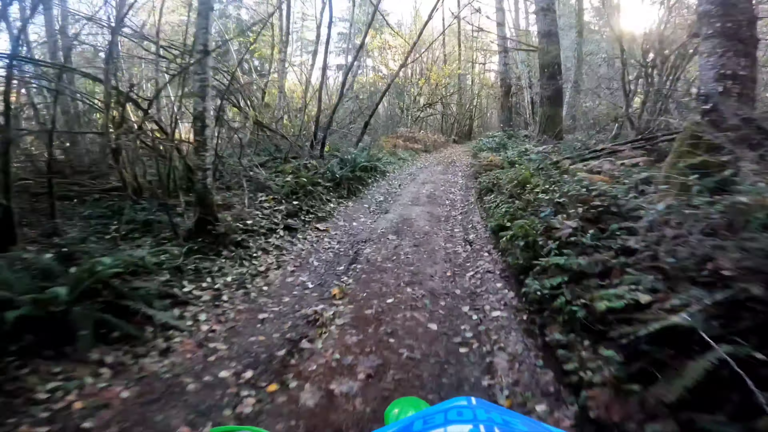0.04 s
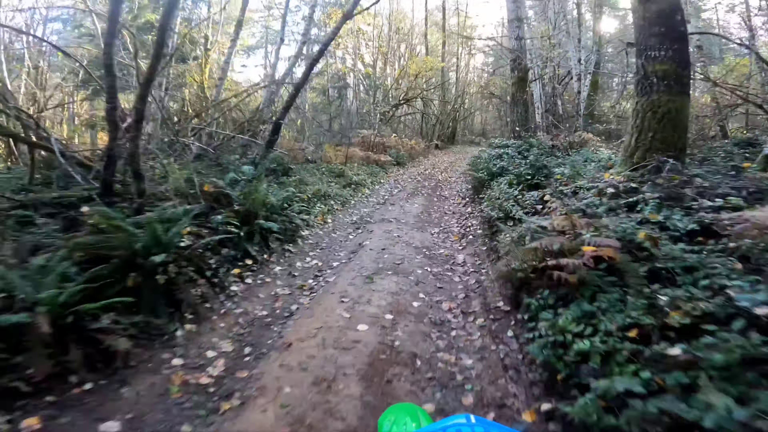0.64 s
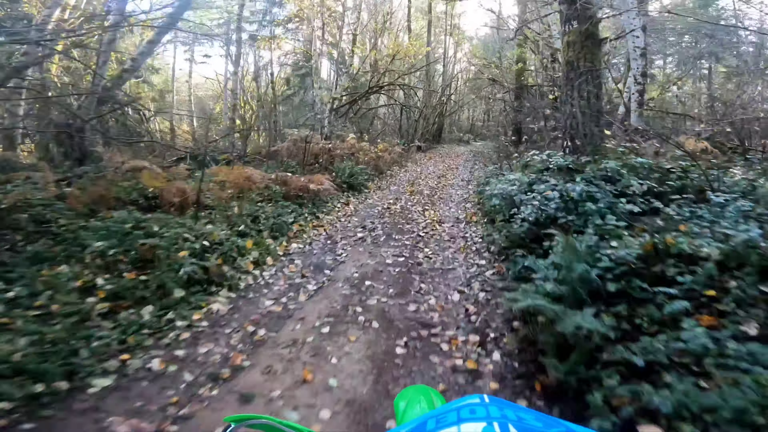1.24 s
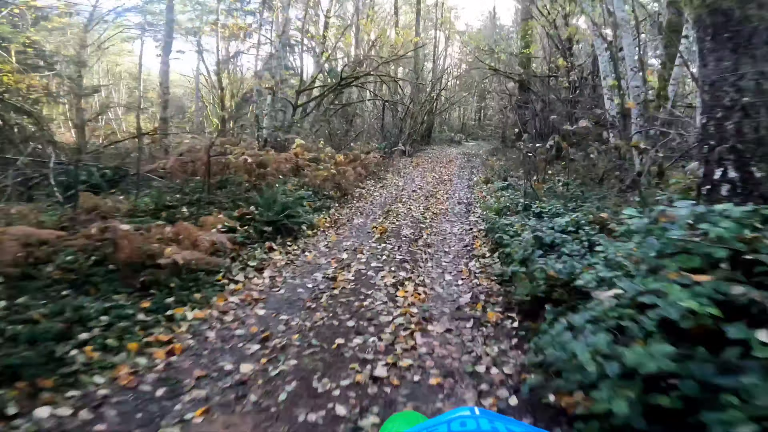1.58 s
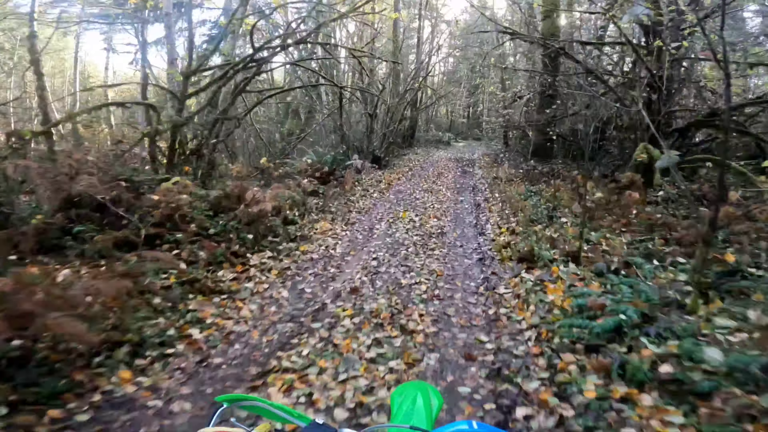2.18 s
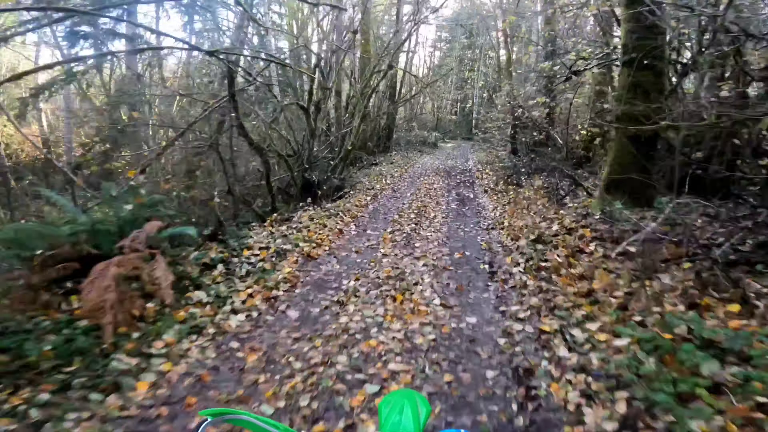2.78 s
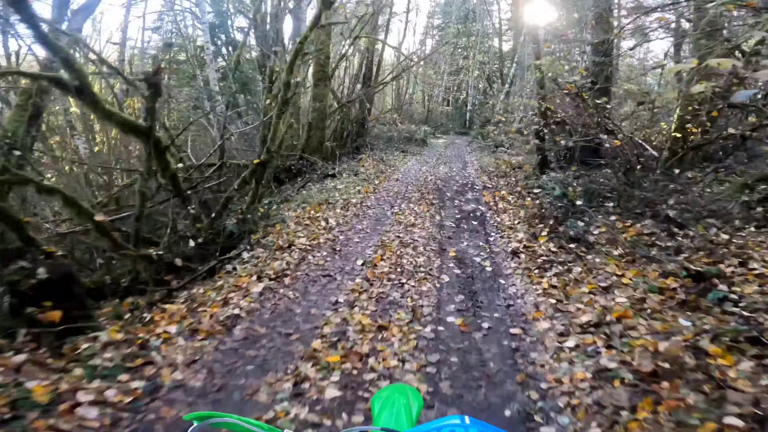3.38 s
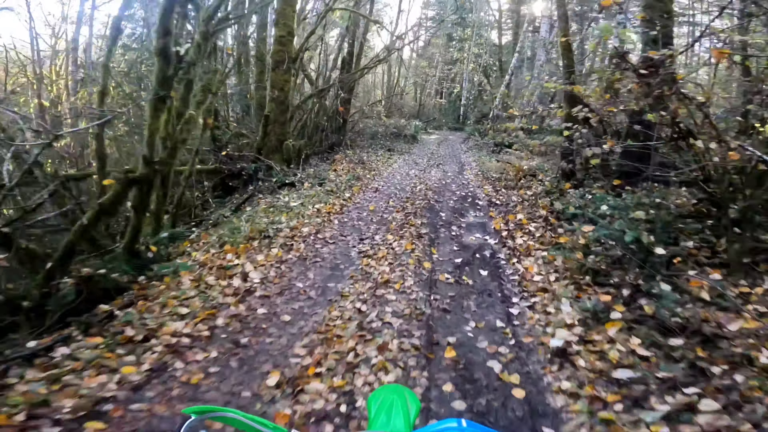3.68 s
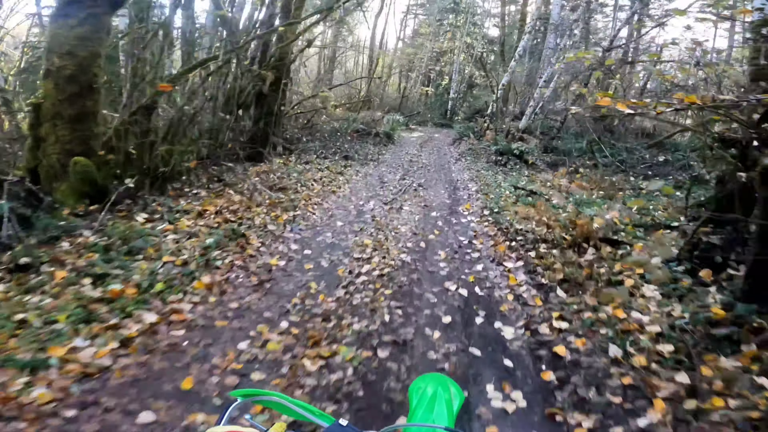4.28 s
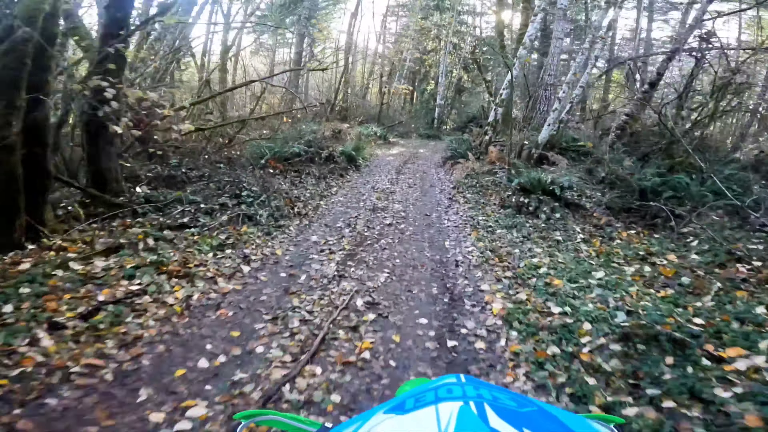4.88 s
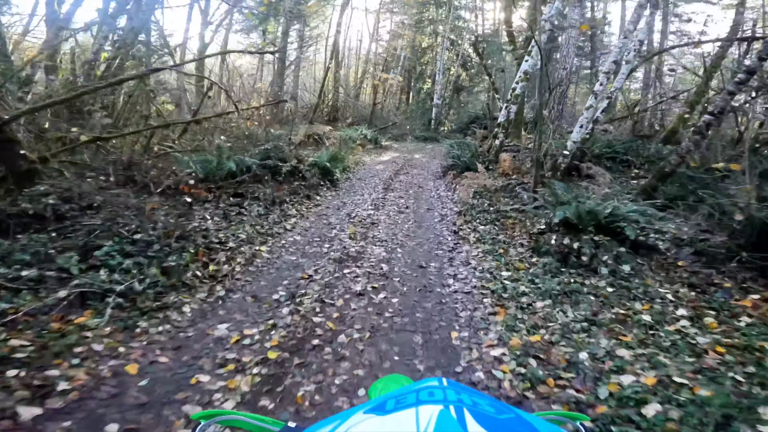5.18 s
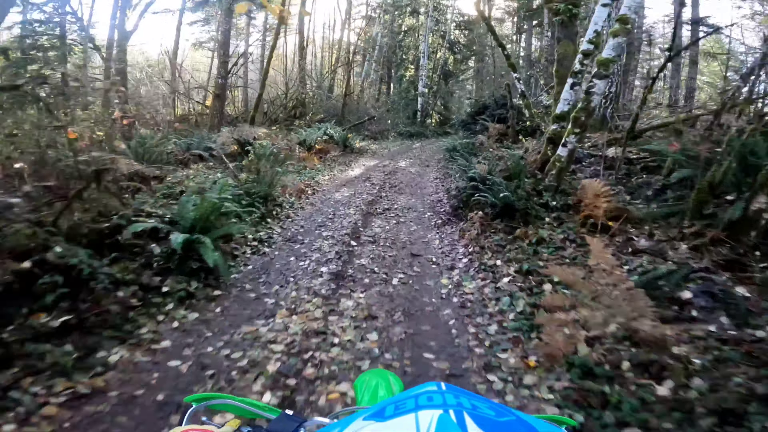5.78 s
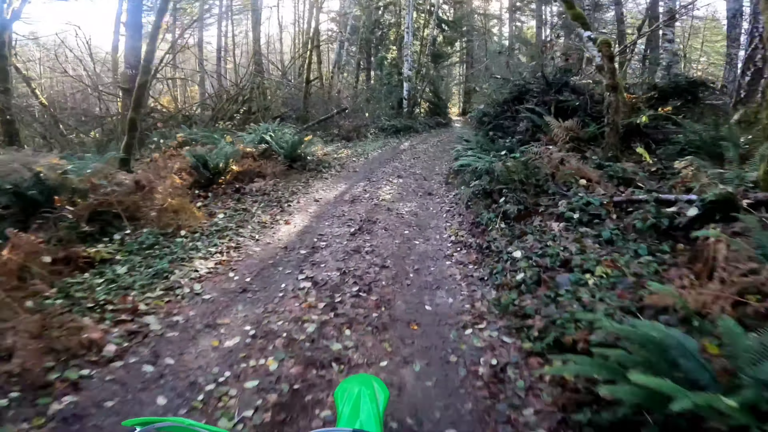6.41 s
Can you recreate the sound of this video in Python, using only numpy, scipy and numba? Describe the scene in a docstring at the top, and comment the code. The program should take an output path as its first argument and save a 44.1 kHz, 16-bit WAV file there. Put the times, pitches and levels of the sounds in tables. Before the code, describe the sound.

Heard from the rider, a dirt bike engine thuds along in short throttle bursts, clattering and bumping through forest undergrowth.

```python
"""On a rough forest trail, a single-cylinder four-stroke dirt bike is heard from a camera on the rider.
Each firing excites damped resonances: a thud in the silencer and, with the throttle open, a bark in the
airbox. The crank hums, engine and chain clatter, tyres brush through ferns and loose parts knock.
Bumps shake the camera mount, and gusts of air push on the microphone."""
import sys
import numpy as np
from scipy import signal
from scipy.fft import rfft, irfft
from scipy.io import wavfile
from scipy.ndimage import uniform_filter1d
from numba import njit

SR = 44100
rng = np.random.default_rng(int(sys.argv[2]) if len(sys.argv) > 2 else 0)


def file_out(sig):
    """Save sig as 16-bit WAV at sys.argv[1]."""
    # one column per channel
    cols = np.atleast_2d(sig).T
    # limit, then scale
    lim = np.clip(cols, -1, 1)
    pcm = np.round(lim * 32767).astype(np.int16)
    wavfile.write(sys.argv[1], SR, pcm)


N = 293265

# engine speed (time [s], firing rate [Hz])
FIRING_RATE = [(0.0, 42.04), (0.1, 44.89), (0.27, 41.8), (0.39, 37.94), (0.55, 38.79), (0.66, 42.6),
               (0.77, 40.26), (1.05, 40.48), (1.28, 39.69), (1.38, 35.69), (1.47, 33.57), (1.54, 35.61),
               (1.62, 40.18), (1.85, 40.17), (2.05, 41.01), (2.26, 43.42), (2.35, 36.9), (2.44, 33.56),
               (2.8, 32.85), (3.1, 31.46), (3.45, 30.73), (3.6, 32.42), (3.71, 35.36), (3.85, 31.48),
               (3.98, 31.91), (4.19, 36.2), (4.32, 34.59), (4.47, 36.75), (4.6, 28.11), (4.73, 37.13),
               (4.88, 29.56), (5.05, 30.41), (5.13, 35.19), (5.22, 33.4), (5.42, 36.83), (5.62, 35.39),
               (5.74, 33.69), (5.92, 29), (6.25, 30), (6.42, 32.5), (6.65, 30)]
# twists of the throttle (opens [s], shuts [s], first opening [0-1], last opening [0-1])
TWISTS = [(0.01, 0.22, 0.65, 0.98), (0.22, 0.6, 0.18, 0.35), (0.61, 1.3, 0.96, 0.45),
          (1.54, 2.285, 0.92, 0.64), (3.52, 3.72, 0.34, 0.96), (3.72, 4.0, 0.35, 0.58),
          (4.0, 4.28, 0.87, 0.55), (4.3, 4.47, 0.7, 0.77), (4.61, 4.76, 0.36, 0.78),
          (5.07, 5.48, 0.74, 0.82), (5.48, 5.72, 0.74, 0.42), (6.32, 6.45, 0.34, 0.34)]
# how hard the bike runs, in relative levels
# (time [s], clatter [dB], chain [dB], tyre crunch [dB], rumble [dB])
RIDE = [(0.05, -44, -32.5, -37, -28), (0.32, -44.5, -35, -37, -30), (1.56, -44.5, -36.5, -38, -27),
        (1.97, -48, -43, -41, -33), (2.68, -46, -38.5, -40.5, -32.5), (3.08, -47.5, -41, -42, -33.5),
        (3.7, -47, -41, -41, -29.5), (4.1, -45, -44, -40.5, -30.5), (4.5, -44, -43, -48, -33),
        (4.6, -50, -47.5, -43.5, -32), (4.76, -47, -42, -40.5, -32), (4.87, -52.5, -50, -48, -36.5),
        (5.07, -54.5, -58, -49.5, -35.5), (5.22, -54, -52, -47, -30.5), (5.43, -45.5, -43, -39.5, -34),
        (5.63, -50, -44.5, -41.5, -36.5), (5.8, -48.5, -39, -43, -31), (6.28, -47.5, -41, -42, -36),
        (6.6, -49, -53, -42, -31)]
# engine timbre from pull to pull
# (time [s], boom [Hz], lower bark [Hz], upper bark [Hz], bark [dB], crack [dB], extra thud [dB])
TIMBRE = [(.15, 446.5, 1028, 1072, -36, -53, -0.5), (.9, 451, 918, 1093, -30.5, -50, 0),
          (1.12, 452, 960, 1112, -33.5, -60, 0.5), (1.28, 452, 964, 1070, -33.5, -49, 3),
          (1.7, 454, 1008, 1120, -33.5, -61, -1.5), (2.2, 465, 992, 1126, -33.5, -45.5, -1.5),
          (3.68, 464, 1003, 1103, -32.5, -52, -1), (4.15, 473, 992, 1088, -32, -43, 0),
          (4.42, 477, 1003, 1090, -33.5, -42, 0.5), (4.74, 464, 1003, 1088, -32.5, -45, -3.5),
          (5.2, 471, 1014, 1097, -34.5, -53, -1.5), (5.55, 475, 1010, 1058, -35, -48, 2),
          (5.72, 475, 993, 1090, -35, -50, -0.5), (6.4, 473, 990, 1110, -32.5, -50, 0.5)]
# resonances (frequency [Hz], bandwidth [Hz], relative level [dB], polarity [+1 or -1])
SILENCER_MODES = [(169.5, 43, 5, 1), (237.4, 39.6, 2.5, 1), (280.3, 34, 6.5, -1)]
AIRBOX_MODES = [(604, 12, -16, -1), (744, 17, -13, 1), (899, 57, -7.5, -1), (1190, 85, -12, -1),
                (1707, 50, -18, 1), (2473, 25, -21, 1)]  # the weaker, steady ones
CRACK_MODES = [(1580, 340, 0.5, -1), (1810, 410, -1.5, 1), (2290, 83, -1.5, -1)]  # the bright edge of a hard pull
POP_MODES = [(179, 46, 4, 1), (279, 21, 5, -1), (463, 25, 5, 1), (660, 84, -9, -1), (1050, 93, -4.5, 1)]
CASE_MODES = [(452, 22, 2, 1), (667, 40, -0.5, -1), (1043, 99, 6.5, 1), (1360, 166, -1.5, -1),
              (1733, 98, 1.5, 1), (1885, 20, -3.5, 1), (2380, 240, -5, -1), (2723, 212, -4, 1),
              (3196, 454, -6, -1)]  # engine cases and frame
CHAIN_MODES = [(3830, 70, -9.5, 1), (4214, 124, -1.5, 1), (4440, 150, 1, -1), (4676, 101, 6, 1),
               (5150, 110, -4, -1)]  # chain and sprockets
THIN_METAL_MODES = [(1698, 20, 0, 1)]
SUSPENSION_MODES = [(77, 11, 0, 1), (110, 18, -8, -1)]
# the airbox's lower and upper bark modes (bandwidth [Hz], relative level [dB])
BARK_MODES = [(65, -2.5), (85, -3)]
# bands cancelled by the intake duct (frequency [Hz], bandwidth [Hz])
DUCT_NOTCHES = [(548, 30), (810, 28)]
# crank and piston hum, from harmonic 2 of the firing rate upward (relative level [dB])
CRANK_HARMONICS = [-2, -3, 0.5, -3.5, -4, -8.5]
# impulses (time [s], relative level [dB])
POPS = [(.423, -28), (.475, -26.5), (6.165, -23), (6.595, -27.5)]  # stray firings
KNOCKS = [(0.553, -33), (1.196, -25), (2.544, -30), (4.882, -29), (5.832, -23), (6.256, -32)]  # loose parts
THUMPS = [(.555, -12.5), (1.06, -15), (2.39, -21), (2.65, -17), (3.12, -22), (4.985, -13.5), (6.615, -19)]  # roots under the wheels
# swells (centre time [s], duration [s], level [dB])
METAL_SWELLS = [(.88, 0.39, -42)]  # a thin part rings
FERNS = [(2.25, 0.14, -39.5), (4.21, 0.21, -37.5), (4.45, 0.26, -37.5), (5.47, 0.12, -39.5)]  # fronds sweep along the bike
BUMPS = [(0.29, 0.061, -19.5), (1.01, 0.24, -21.5), (1.15, 0.12, -30), (1.315, 0.14, -16.5),
         (1.53, 0.18, -19), (1.88, 0.17, -16), (2.236, 0.3, -17.5), (2.472, 0.022, -17), (4.03, 0.22, -26),
         (4.22, 0.096, -26.5), (4.66, 0.094, -35), (4.8, 0.21, -16.5), (5.5, 0.48, -21), (5.78, 0.087, -27)]  # the mount shakes
GUSTS = [(1.65, 0.53, -21), (3.05, 0.28, -19), (3.9, .6, -21), (4.65, 0.58, -16.5), (6.45, 0.34, -28.5)]  # air meets the microphone
# noise spectra (frequency [Hz], relative level [dB])
BRUSH_SPECTRUM = [(300, -17), (550, 3.5), (1200, 15.5), (2000, -0.5), (3000, -15), (3550, -10.5), (4050, 7),
                  (5000, 7.5), (5800, 1), (7000, 0), (7700, -7.5), (8500, -26.5)]  # tyres and ferns
RUMBLE_SPECTRUM = [(20, -18.5), (45, 11.5), (62, -2), (85, -0.5), (115, -8), (150, -3), (220, -5),
                   (315, -3.5), (400, -15.5), (600, -21.5), (1500, -67.5)]  # the ground, through the frame
BUFFET_SPECTRUM = [(2, -23.5), (7, 10), (12, -17), (22, -4.5), (35, -28), (70, -26.5), (300, -96)]  # air on the microphone
RASP_SPECTRUM = [(200, -11), (500, 0), (750, 4), (1300, 3.5), (1900, -4), (2500, -9.5),
                 (3600, -25), (7000, -60)]  # intake gas
TREMBLE_SPECTRUM = [(15, -26.5), (30, 2.5), (41, 2), (50, -6.5), (62, -31), (200, -81)]  # the mount


def exhaust(cycles, throttle):
    """Impulse excitation: each firing rings the silencer's modes in a thud, louder under load."""
    shut_db, load_db, ride_share = -39, 9.5, 0.41
    pulses = delay(firings(cycles, scatter_db=0.6, jitter_ms=0.05), delay_s=0.00085)
    thud = unit(ring(pulses + undb(-21) * puff(pulses, decay_s=0.012), SILENCER_MODES))
    ride_db = curve(RIDE, column=1)
    level_db = shut_db + load_db * np.sqrt(throttle) + curve(TIMBRE, column=6)
    level_db += ride_share * (ride_db - ride_db.mean())
    return pan(thud * undb(level_db), left_db=1.2)


def intake(cycles, throttle, rate_hz):
    """Cavity resonance: gulps of air bark and boom in the airbox; gas rasps, and hard pulls crack."""
    opening = np.maximum(throttle, 0.035)  # a shut throttle still passes a little air
    pulses = firings(cycles, scatter_db=0.35, jitter_ms=0.035) * opening
    reflection = 0.13 * delay(pulses, delay_s=0.00469)  # from the end of the duct
    gulps = pulses + reflection + undb(-21) * puff(pulses, decay_s=0.006)
    bark = airbox_bark(gulps) * undb(curve(TIMBRE, column=4))
    lugging = undb(-0.42 * rate_hz)  # boom and rasp grow at low revs
    boom_drive = gulps * opening ** -0.39 * lugging  # the lowest mode booms even at a small opening
    boom = -undb(-40) * unit(resonator(boom_drive, curve(TIMBRE, column=1), width_hz=33.0))
    airbox = notch(bark + boom, DUCT_NOTCHES)
    hard_pulses = pulses * opening
    snap = hard_pulses + undb(-5) * puff(hard_pulses, decay_s=0.004)
    crack = unit(ring(snap, CRACK_MODES)) * undb(curve(TIMBRE, column=5))
    rasp = undb(-47.5) * colour(puff(pulses * lugging, decay_s=0.022), RASP_SPECTRUM)
    return pan(airbox, left_db=1.5) + pan(crack, left_db=4) + pan(rasp, left_db=19.5)


def airbox_bark(gulps):
    """Modal superposition: two strong, drifting resonances sound among weaker, steady ones."""
    drifting = sum(undb(db) * width * resonator(gulps, curve(TIMBRE, column=2 + k), float(width))
                   for k, (width, db) in enumerate(BARK_MODES))
    steady = sum(sign * undb(db) * width * resonator(gulps, np.full(N, float(hz)), float(width))
                 for hz, width, db, sign in AIRBOX_MODES)
    return unit(drifting + steady)


def firings(cycles, scatter_db, jitter_ms):
    """A quasi-periodic pulse train: one pulse per engine cycle, varying slightly in size and time."""
    onsets = np.nonzero(np.diff(np.floor(cycles)))[0]
    size, timing = rng.standard_normal((len(onsets), 2)).T
    onsets += (timing * jitter_ms * SR / 1000).astype(int)
    pulses = np.zeros(N)
    pulses[np.clip(onsets, 0, N - 1)] = undb(scatter_db * size)
    return pulses


def throttle_opening(snap_s=0.05):
    """The load envelope: each twist snaps open, rolls on or off, and snaps shut."""
    return sum(curve([(opens, 0), (opens + snap_s, first), (shuts, last), (shuts + snap_s, 0)])
               for opens, shuts, first, last in TWISTS)


def crank(cycles, throttle):
    """Forced vibration: crank and piston shake the frame once a turn; higher partials fade under load."""
    phase = 2 * np.pi * cycles + 0.04 * walk(10)
    overrun = np.clip(1 - 2 * throttle, 0.2, 1)
    hum = np.zeros(N)
    for harmonic, db in enumerate(CRANK_HARMONICS, start=2):
        gain = undb(db + 1.5 * walk(9)) * (overrun if harmonic > 2 else 1)
        hum += gain * np.sin(harmonic * phase)
    return hum * undb(0.5 * curve(RIDE, column=2) - 21.5)


def clatter(cycles, throttle):
    """Impact noise: valve gear and piston tick on the cases, hardest once per crank turn."""
    beat = undb(0.11 * np.cos(4 * np.pi * cycles))
    ticks = wide(lambda: ring(grains(spread_db=1.5) * beat, CASE_MODES), side_db=-3, left_db=5)
    return ticks * undb(curve(RIDE, column=1) + 0.19 * throttle + 1.32 * walk(25) + 10)


def pops():
    """Transient response: a stray firing and its turbulent gas ring low modes in a throaty chuff."""
    blows = impulses(POPS)
    chuffs = ring(blows + undb(2) * puff(blows, decay_s=0.009), POP_MODES)
    return pan(undb(23) * chuffs, left_db=2)


def thin_metal(cycles):
    """Sympathetic vibration: a thin metal part rings along with the firings for a moment."""
    ringing = unit(ring(firings(cycles, scatter_db=2, jitter_ms=0.29), THIN_METAL_MODES))
    return pan(ringing * swells(METAL_SWELLS), left_db=8)


def chain(cycles):
    """Dense impacts: links strike the sprockets in a ringing whirr, modulated by each crank turn."""
    tugs = undb(np.cos(4 * np.pi * cycles))
    links = wide(lambda: ring(grains(spread_db=2.5) * tugs, CHAIN_MODES), side_db=-9, left_db=-4.5)
    return links * undb(curve(RIDE, column=2) + 0.5 * walk(70) + 0.26)


def trail():
    """Contact noise: tyres crunch through litter, ferns sweep by, and the ground rumbles up the frame."""
    brush = wide(lambda: colour(grains(spread_db=1.5), BRUSH_SPECTRUM), side_db=-9.5, left_db=-1)
    brush_gain = np.hypot(undb(curve(RIDE, column=3)), swells(FERNS))
    rumble = wide(lambda: noise(RUMBLE_SPECTRUM), side_db=-25, left_db=-1)
    return brush * brush_gain + rumble * undb(curve(RIDE, column=4) + walk(15))


def knocks():
    """Free vibration: loose parts strike the frame, chatter briefly and leave its modes ringing."""
    blows = impulses(KNOCKS)
    return undb(6) * ring(blows + undb(8.5) * puff(blows, decay_s=0.014), CASE_MODES)


def suspension():
    """Damped oscillation: roots jolt the suspension's low modes into a thump."""
    return undb(14.5) * ring(impulses(THUMPS), SUSPENSION_MODES)


def wind(shaking):
    """Pressure fluctuation: air pushes slowly on the microphone, harder in gusts and over bumps."""
    buffet = wide(lambda: noise(BUFFET_SPECTRUM), side_db=-17, left_db=0)
    breeze = undb(-27.5 + 2 * walk(1.7))
    surges = swells(GUSTS) + undb(-12.5) * shaking
    return buffet * np.hypot(breeze, surges)


def mount(cycles, shaking):
    """Structure-borne sound: the mount shudders at the firing rate on bumps; small roots make it tremble."""
    shudder = np.sqrt(2) * np.sin(2 * np.pi * cycles + 2.2 + 0.25 * walk(10))
    tremble = wide(lambda: noise(TREMBLE_SPECTRUM), side_db=-22, left_db=-3)
    return shudder * shaking + undb(-33) * tremble


def ring(force, modes):
    """Convolution with a unit-energy impulse response, a sum of damped sinusoids."""
    t = np.arange(SR // 5) / SR
    response = sum(sign * undb(db) * width * np.exp(-np.pi * width * t) * np.sin(2 * np.pi * hz * t)
                   for hz, width, db, sign in modes)
    return signal.fftconvolve(force, response / np.sqrt(np.sum(response ** 2)))[:N]


@njit
def resonator(force, hz, width_hz):
    """A damped oscillator whose natural frequency may move."""
    out, state = np.empty(len(force)), 0j
    for i in range(len(force)):
        state = state * np.exp((2j * np.pi * hz[i] - np.pi * width_hz) / SR) + force[i]
        out[i] = state.imag
    return out


def notch(x, bands):
    """Antiresonance: each narrow band is cancelled."""
    for hz, width in bands:
        x = signal.lfilter(*signal.iirnotch(hz, hz / width, fs=SR), x)
    return x


def puff(pulses, decay_s):
    """Exponential decay: a burst of noise follows each pulse and dies away."""
    envelope = signal.lfilter([1], [1, -np.exp(-1 / (decay_s * SR))], pulses)
    return unit(envelope * rng.standard_normal(N)) * np.std(pulses)


def grains(spread_db):
    """Granular noise: dense, tiny impacts of log-normal size, 32 samples each."""
    hiss = rng.standard_normal(N)
    sizes = undb(spread_db * rng.standard_normal(N // 32 + 1))
    return unit(hiss * np.repeat(sizes, 32)[:N])


def colour(x, spectrum):
    """Spectral shaping along a log-frequency axis, to rms 1."""
    hz, db = np.transpose(spectrum)
    bin_hz = np.maximum(np.arange(N // 2 + 1) * SR / N, 1)
    gain = undb(np.interp(np.log(bin_hz), np.log(hz), db))
    return unit(irfft(rfft(x) * gain, N))


def noise(spectrum):
    """Gaussian noise with the given spectrum."""
    return colour(rng.standard_normal(N), spectrum)


def impulses(table):
    """Ideal impacts: one single-sample pulse per row."""
    blows = np.zeros(N)
    for time_s, db in table:
        blows[int(time_s * SR)] = undb(db)
    return blows


def swells(table):
    """An amplitude envelope with one rounded swell per row."""
    t = np.arange(0, N, 100) / SR
    gain = sum(undb(db) * np.exp(-np.abs(2 * (t - centre) / length) ** 3) for centre, length, db in table)
    return curve(np.column_stack([t, gain]))


def walk(rate_hz):
    """Slow random modulation: rate_hz values a second, joined and smoothed, at rms 1."""
    step = int(SR / rate_hz)
    levels = rng.standard_normal(N // step + 2)
    joined = np.interp(np.arange(N), np.arange(len(levels)) * step, levels)
    return unit(uniform_filter1d(joined, step))


def wide(source, side_db, left_db):
    """Partial coherence: an independent share of an extended source reaches the channels in antiphase."""
    return pan(unit(source() + undb(side_db) * source() * np.array([[1], [-1]])), left_db)


def pan(x, left_db):
    """Direction by level difference: the left channel stands left_db above the right."""
    return x * undb(np.array([[left_db], [-left_db]]) / 2)


def delay(x, delay_s):
    """Propagation delay: the same wave arrives later."""
    lag = int(delay_s * SR)
    return np.concatenate([np.zeros(lag), x[:N - lag]])


def curve(table, column=1):
    """Linear interpolation of one column over time."""
    rows = np.array(table)
    return np.interp(np.arange(N) / SR, rows[:, 0], rows[:, column])


def unit(x):
    """Normalisation to rms 1."""
    return x / np.sqrt(np.mean(x ** 2))


def undb(db):
    """Decibels to amplitude ratio."""
    return np.exp(np.asarray(db) * np.log(10) / 20)


def scene():
    """Superposition: the engine's sounds share one cycle, and the trail and the air add theirs."""
    throttle = throttle_opening()
    rate_hz = curve(FIRING_RATE)
    cycles = 0.23 + np.cumsum(rate_hz) / SR  # one firing and two crank turns per cycle
    shaking = swells(BUMPS)
    engine = exhaust(cycles, throttle) + intake(cycles, throttle, rate_hz)
    engine += crank(cycles, throttle) + clatter(cycles, throttle) + pops() + thin_metal(cycles)
    rolling = chain(cycles) + trail() + knocks() + suspension()
    return engine + rolling + wind(shaking) + mount(cycles, shaking)


def record(dry):
    """Band limiting: the camera's steep low-pass filter cuts the top of the treble."""
    cutoff_hz = 8300
    return signal.sosfilt(signal.ellip(10, 0.2, 80, cutoff_hz, fs=SR, output="sos"), dry)


dry = scene()
out = record(dry)
file_out(out)
```